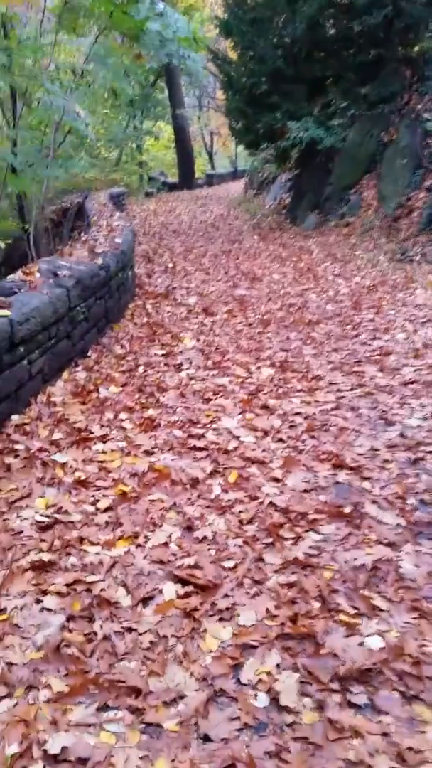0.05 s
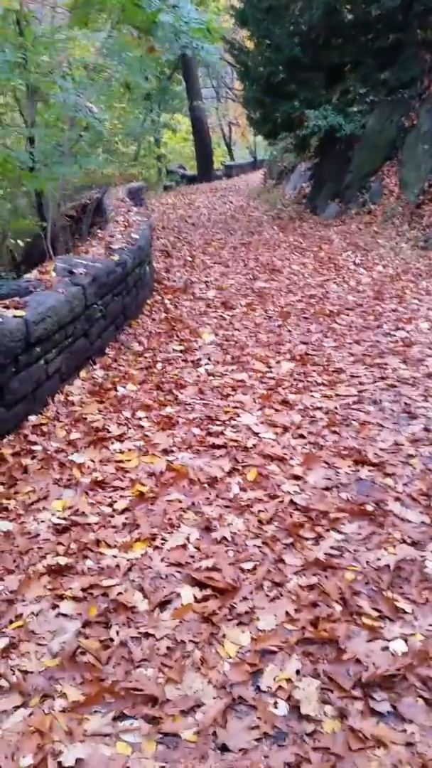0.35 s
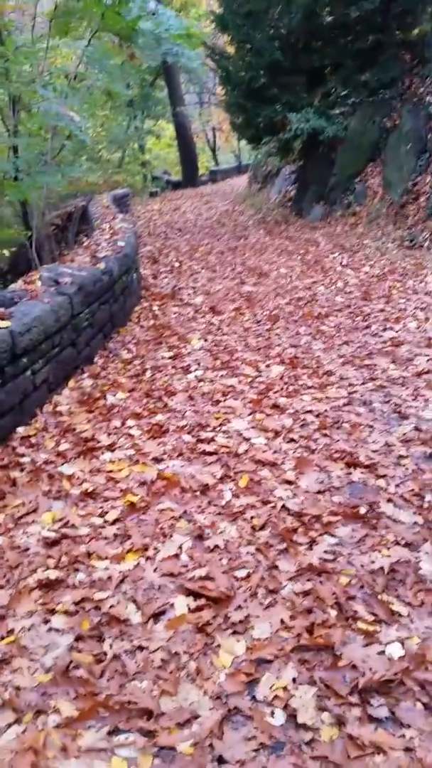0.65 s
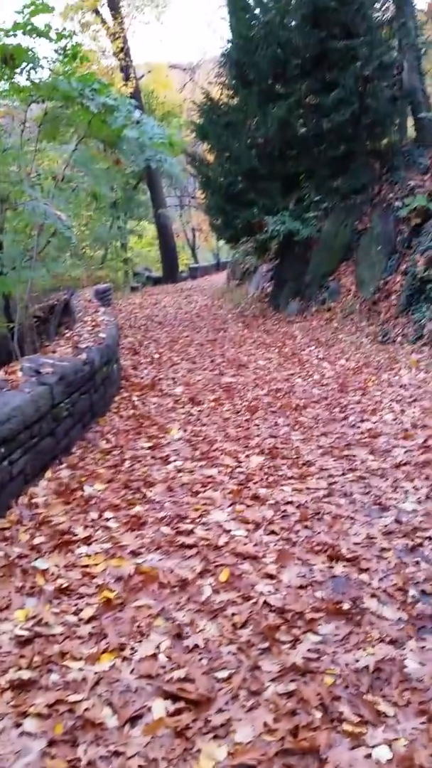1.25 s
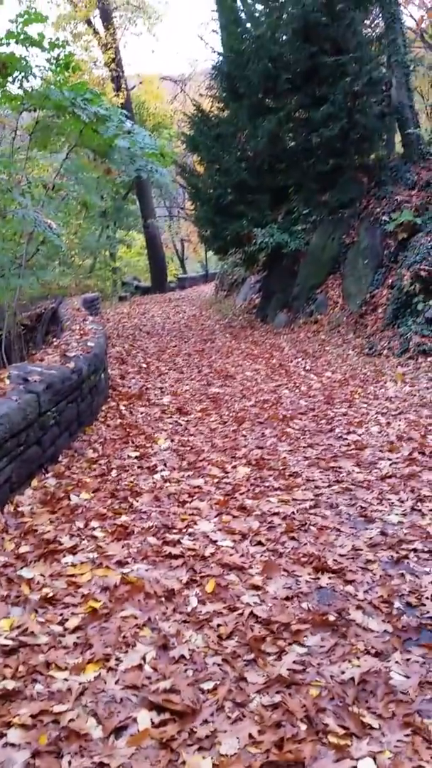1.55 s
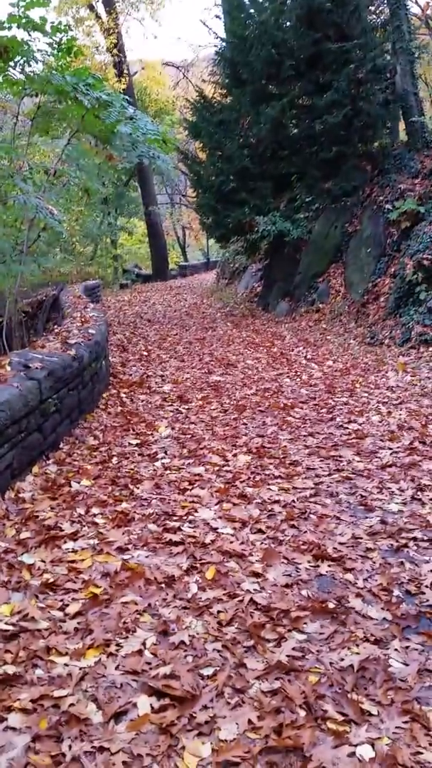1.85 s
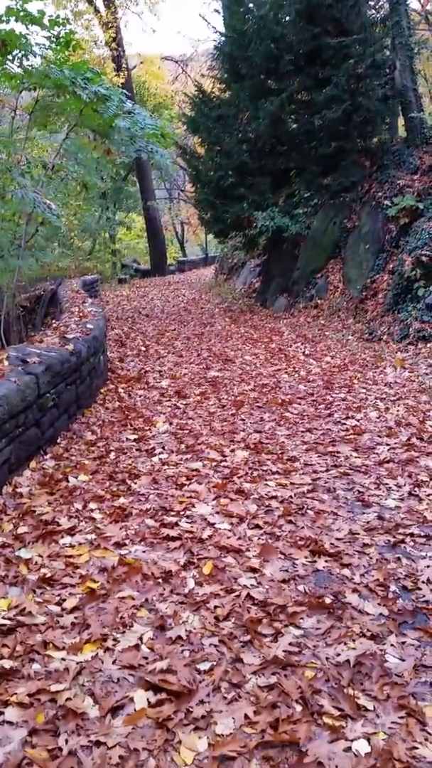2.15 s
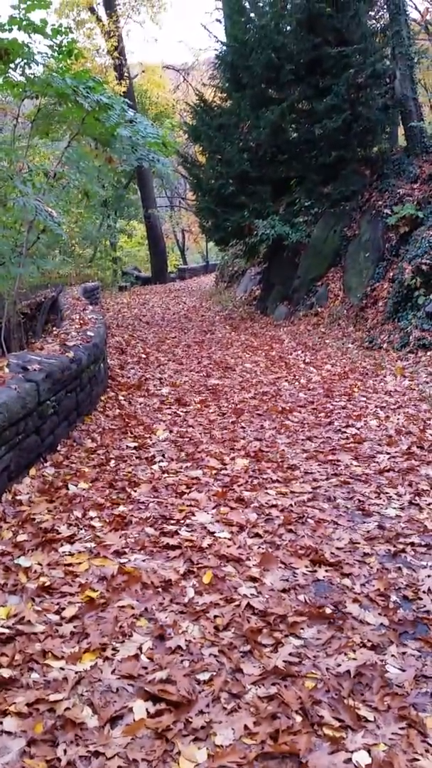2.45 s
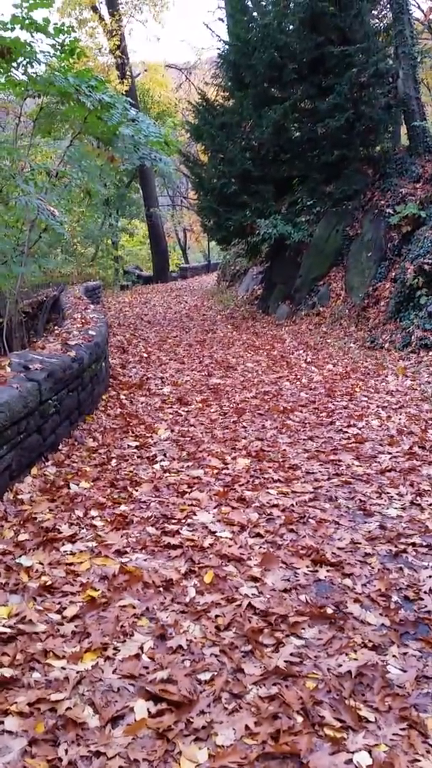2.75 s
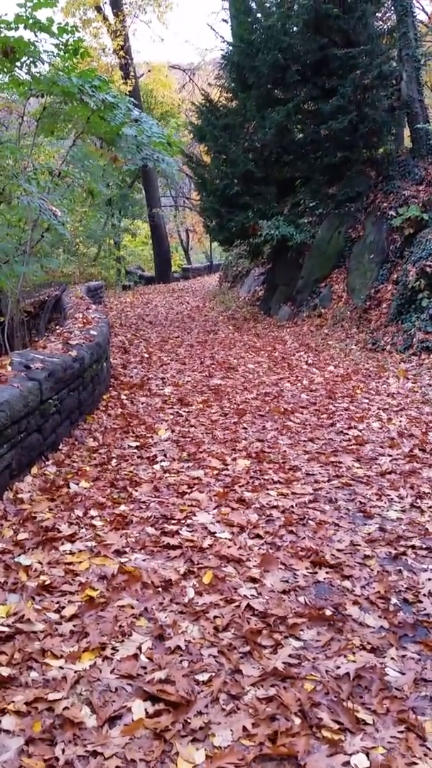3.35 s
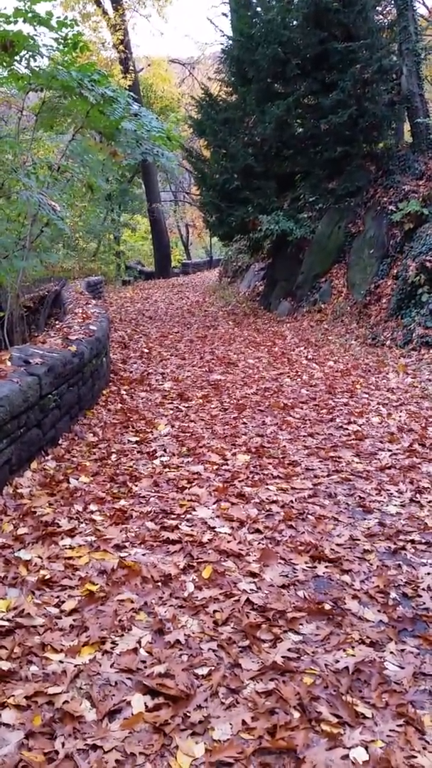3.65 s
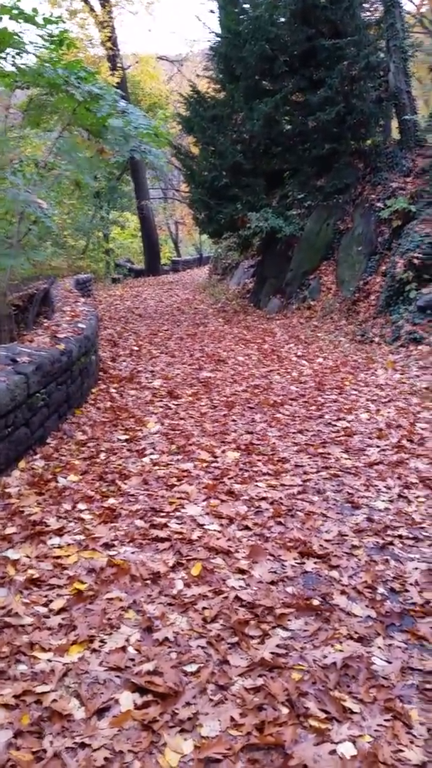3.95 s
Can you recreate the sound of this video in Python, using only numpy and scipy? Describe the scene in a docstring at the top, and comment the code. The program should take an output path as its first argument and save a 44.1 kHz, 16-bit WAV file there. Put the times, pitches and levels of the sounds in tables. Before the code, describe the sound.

A low rumble of distant traffic and wind carries a thumping rotor, probably a helicopter, that fades. Close to the microphone on a wooded path, dry leaves tick, rustle suddenly past the middle, then settle.

```python
"""A leaf-covered path in a wooded park, with traffic and wind washing in from far away.
A distant rotor, probably a helicopter, thumps twelve times a second, once per blade, and fades.
A heavy engine changes gear and pulls away. Faint thin whistles and a brief, very high hiss come and go.
Close by, dry leaves tick, rustle suddenly and settle: many tiny snaps, and leaf sliding over leaf."""
import sys
import numpy as np
from scipy import signal
from scipy.fft import rfft, irfft
from scipy.io import wavfile

SR = 44100
rng = np.random.default_rng(int(sys.argv[2]) if len(sys.argv) > 2 else 0)


def master(y):
    """Save y as 16-bit WAV."""
    cut = np.clip(np.atleast_2d(y).T, -1, 1)
    pcm = np.round(cut * 32767)  # scale
    wavfile.write(sys.argv[1], SR, pcm.astype(np.int16))


N = 176400
T = np.arange(N) / SR
BASS_PAN_DB = -2.5  # pan is left level minus right level, so below 0 leans right

# tone colour (how strong each frequency is) of traffic and wind: f/Hz, relative level/dB
WASH_COLOUR = [(110, -29.5), (200, -7), (300, -7), (430, -5.5), (600, -10), (900, -10), (1400, -14.5),
               (2000, -21.5), (2700, -26.5), (3250, -38), (4200, -39), (5400, -46), (6400, -50.5),
               (7400, -76), (8200, -54), (9100, -40.5), (10800, -57.5), (12500, -48.5), (15500, -49)]
# slight swell of the wash: t/s, level change/dB
WASH_SWELL = [(0, 0), (1, 0), (2, -0.5), (2.7, 0.5), (4, 0.5)]
# how alike the wash is on both sides: f/Hz, likeness (1 = same, 0 = unrelated)
WASH_LIKENESS = [(100, 0.92), (300, 0.97), (640, 0.88), (1400, 0.39), (3100, -.1), (7000, -0.035)]
# where the wash sits: f/Hz, pan/dB
WASH_PAN = [(200, -1.5), (700, -1.5), (1200, -5.5), (2000, -8), (3300, -9.5), (5500, -11.5), (7500, -14),
            (9000, 7), (15000, 4)]
# tone colour of the low rumble: f/Hz, relative level/dB
RUMBLE_COLOUR = [(10, -28), (25, -16), (45, 3.5), (70, -0.5), (105, 1.5), (150, -4), (230, -11),
                 (300, -18.5), (600, -66)]
# loudness of the rumble: t/s, level/dB
RUMBLE_LEVEL = [(0, -37.5), (1, -35), (2, -38.5), (3, -37.5), (4, -39.5)]
# where the rumble sits: f/Hz, pan/dB
RUMBLE_PAN = [(30, -1), (100, -3), (220, 0)]
# thin whistles and, in the last row, a brief, faint, very high hiss:
# t/s, length/s, f/Hz, width/Hz, level/dB, pan/dB
WHISTLES_AND_HISS = [(1.85, .45, 2890, 129.6, -69, -2), (1.95, .28, 7000, 300, -74.5, -8),
                     (1.83, .54, 8800, 530, -71, -2), (2.724, 0.6, 3390, 60, -64.5, -11.5),
                     (3.221, 0.91, 3274, 70.05, -65, -7), (3.27, .23, 14600, 450, -63, 6)]
# the engine's note, which is how often it fires: t/s, f/Hz, level/dB
ENGINE_NOTE = [(0, 101.2, -29), (.18, 101.4, -40), (.3, 92.7, -38), (.5, 84.16, -36), (.75, 78.8, -40),
               (1.2, 82, -44), (1.95, 87.53, -41), (2.35, 88.7, -44), (2.6, 90.77, -32.5),
               (2.76, 90.27, -41), (2.86, 90.4, -37.5), (3.15, 90.72, -36), (3.26, 91.4, -43),
               (3.36, 92.1, -38.5), (3.56, 92.16, -40), (3.8, 92.43, -40), (3.9, 92.5, -35), (4, 92.5, -39)]
# higher tones that swell in turn: multiple of the note, level/dB, loudest at t/s, swell half-width/s
ENGINE_OVERTONES = [(1.5, -42, 1.25, 0.37), (2, -44.5, 1.729, 0.22), (2.5, -49, 2.6, 0.74)]
# loudness of the blade thumps: t/s, level/dB
ROTOR_LEVEL = [(0, -26.5), (.25, -24), (.5, -17.5), (.75, -21), (1.05, -25), (1.38, -19), (1.65, -24.5),
               (2.05, -23), (2.25, -26), (2.4, -32), (3, -30), (4, -33.5)]
# loudness of the rustle's two parts: t/s, swish level/dB, crisp level/dB
RUSTLE_LEVELS = [(0, -53.5, -53), (.07, -55.5, -61.5), (.28, -59, -65), (.5, -63.5, -71), (.9, -65.5, -74),
                 (1.75, -62.5, -73), (1.9, -60.5, -67), (2.08, -58, -73), (2.33, -58, -66),
                 (2.37, -50, -57), (2.46, -44.5, -47.5), (2.53, -47.5, -50), (2.58, -44, -44),
                 (2.66, -46.5, -45), (2.73, -47.5, -49), (2.77, -52, -52.5), (2.84, -48.5, -52),
                 (2.96, -53.5, -54), (3.24, -54, -56), (3.31, -52, -53.5), (3.38, -56, -59),
                 (3.46, -52.5, -52.5), (3.59, -55, -54.5), (3.67, -55, -62), (3.75, -53.5, -62),
                 (3.82, -54.5, -57), (3.95, -53.5, -59.5)]
# tone colour of the leaves' soft swish: f/Hz, relative level/dB
SWISH_COLOUR = [(600, -26), (1400, 3), (2400, 2.5), (3100, -3.5), (3900, -1.5), (4500, -3), (5300, -14.5),
                (6600, -11.5), (7600, -22), (9500, -21), (16000, -58)]
# where the swish sits: f/Hz, pan/dB
SWISH_PAN = [(1400, -10), (2500, -6.5), (4200, -13), (5500, -17), (7500, -6)]
# tone colour of the leaves' crisp treble: f/Hz, relative level/dB
CRISP_COLOUR = [(4000, -52), (6500, -11.5), (7800, -15.5), (8600, -2), (9300, -1.5), (10100, -5),
                (11000, -9.5), (12300, -8.5), (13600, -11), (15600, -13)]
# where the crisp treble sits: f/Hz, pan/dB
CRISP_PAN = [(6500, -9), (8000, 1.5), (9000, 1.5), (10500, -4), (13000, 1.5), (15500, -7)]
# leaves sliding over each other: t/s, length/s, starting f/Hz, glide/(Hz per s), width/Hz, level/dB
SCRAPES = [(0, .5, 4940, 0, 1500, -63.5), (2.395, 0.11, 4890, -7000, 700, -53.5),
           (2.496, 0.042, 3904, -3000, 601.5, -48.5), (2.566, 0.031, 3980, -2000, 800, -49),
           (2.703, .035, 4300, -2000, 1004, -51)]
# leaf and twig ticks: t/s, level/dB, brightness/(dB per octave), pan/dB, decay/s
TICKS = [(.249, -34.5, -9, -10, 0.0016), (1.8025, -40.5, -7.5, -9, 0.0044), (1.8217, -42, -6.5, -7, 0.0038),
         (2.0745, -49, -6, -7, 0.0062), (2.3537, -44.5, 1, -5, .004), (2.594, -44, 2, -9, .003),
         (2.7115, -40.5, -7, -12, .003), (2.7892, -37.5, 4, -3, .002), (2.845, -42, 1, -4, 0.0026),
         (2.925, -40, 9, -1, 0.0019), (3.5295, -36.5, 8, -2, .0025), (3.555, -44, 12, -6, .003)]
# tone colour the ticks start from: f/Hz, relative level/dB
TICK_COLOUR = [(300, -21), (1500, -8), (1950, 0), (2400, 4), (3300, -2), (4400, 0.5), (5600, -15.5),
               (7500, -12), (9000, 0), (11500, -16.5), (15500, -18)]


def amp(db):
    """Turns decibels into a number to multiply by."""
    return 10 ** (np.asarray(db) / 20)


def unit(x):
    """Scales a signal to an average strength (rms) of 1."""
    return x / np.sqrt(np.mean(x ** 2) + 1e-20)


def at_hz(points, hz):
    """Reads a table at frequencies hz, giving each octave about equal room."""
    f, value = np.transpose(points)
    return np.interp(np.log(hz + 1), np.log(f + 1), value)


def at_time(rows, t):
    """Reads each value column of a table at times t."""
    times, *columns = np.transpose(rows)
    return [np.interp(t, times, column) for column in columns]


def pan(db):
    """Left and right gains that differ by db."""
    return amp(np.array([[.5], [-.5]]) * db)


def add(mix, start, sound):
    """Mixes a stereo sound in, start seconds from the beginning."""
    part = mix[:, max(round(start * SR), 0):][:, :sound.shape[1]]
    part += sound[:, :part.shape[1]]


def drift(rate_hz):
    """A smooth random wander of strength 1; a higher rate wanders faster."""
    hz = np.fft.rfftfreq(N, 1 / SR)
    keep_slow = np.exp(-(hz / rate_hz) ** 2) * (hz > 0)
    return unit(irfft(rfft(rng.standard_normal(N)) * keep_slow, N))


def colour(x, levels, pans):
    """Gives each frequency of a stereo signal its level and pan; the result has strength 1."""
    hz = np.fft.rfftfreq(N, 1 / SR)
    return unit(irfft(rfft(x) * amp(at_hz(levels, hz)) * pan(at_hz(pans, hz)), N))


def fuzzy_tone(hz, width_hz):
    """A band of noise that follows the pitch curve hz, unrelated left and right."""
    pole = np.exp(-np.pi * width_hz / SR)
    noise = rng.standard_normal((2, N)) + 1j * rng.standard_normal((2, N))
    smoothed = signal.lfilter([1], np.poly([pole, pole]), noise)[:, -len(hz):]
    tone = np.exp(2j * np.pi * np.cumsum(hz) / SR)
    return unit((smoothed * tone).real)


def air():
    """Stereo noise whose two sides are alike in the bass and nearly unrelated in the treble."""
    left, other = rfft(rng.standard_normal((2, N)))
    likeness = at_hz(WASH_LIKENESS, np.fft.rfftfreq(N, 1 / SR))
    right = likeness * left + np.sqrt(1 - likeness ** 2) * other
    return irfft(np.array([left, right]), N)


def traffic_and_wind(level_db=-42.5):
    """Far traffic and wind blur into one wash of noise over a low rumble."""
    wash = colour(air(), WASH_COLOUR, WASH_PAN)
    wash_db = level_db + at_time(WASH_SWELL, T)[0] + 0.38 * drift(2.7)
    rumble = colour(air(), RUMBLE_COLOUR, RUMBLE_PAN)
    return wash * amp(wash_db) + rumble * amp(at_time(RUMBLE_LEVEL, T)[0])


def whistles_and_hiss(fade_s=0.064):
    """Narrow bands of noise fade in and out: thin whistles and one brief, faint, very high hiss."""
    out = np.zeros((2, N))
    for start, length, hz, width_hz, db, pan_db in WHISTLES_AND_HISS:
        t = np.arange(0, length, 1 / SR)
        fade = np.minimum(np.minimum(t, length - t) / fade_s, 1)
        band = fuzzy_tone(np.full(len(t), hz), width_hz)
        add(out, start, band * fade * amp(db) * pan(pan_db))
    return out


def engine(waver_db=3.5, hum_hz=213.9, hum_db=-55.5):
    """The exhaust note sags at a gear change and climbs again, beside a hum that stays near one pitch."""
    hz, db = at_time(ENGINE_NOTE, T)
    firings = np.cumsum(hz + 0.42 * drift(4.8)) / SR
    out = amp(db + waver_db * drift(9.8)) * np.sin(2 * np.pi * firings)
    for multiple, overtone_db, loudest_s, swell_s in ENGINE_OVERTONES:
        swell = amp(overtone_db + waver_db * drift(2.7)) / (1 + ((T - loudest_s) / swell_s) ** 2)
        out += swell * np.sin(2 * np.pi * (multiple * firings + rng.random()))
    hum_gain = amp(hum_db + waver_db * drift(2.8))
    hum_cycles = np.cumsum(hum_hz + 2.48 * drift(10.7)) / SR
    out += hum_gain * np.sin(2 * np.pi * hum_cycles)
    return np.sqrt(2) * out * pan(BASS_PAN_DB)


def rotor(first_s=-0.0045, gap_s=0.08295, thump_hz=64.2, width_s=0.012, scatter_db=0.5):
    """Each blade sends one push and pull of air pressure, dulled by distance."""
    out = np.zeros(N)
    for centre in np.arange(first_s, N / SR, gap_s):
        near = abs(T - centre) < 4 * width_s
        t = T[near] - centre
        size = amp(at_time(ROTOR_LEVEL, centre)[0] - scatter_db * rng.standard_normal())
        out[near] -= size * np.sin(2 * np.pi * thump_hz * t) * np.exp(-(t / width_s) ** 2)
    return out * pan(BASS_PAN_DB)


def crackle(snaps_per_s=1500, spread_db=2.5, snap_share=0.26, clump_db=1.0):
    """Countless tiny snaps over the hiss of sliding leaves, swelling in small clumps."""
    sizes = amp(spread_db * np.minimum(rng.exponential(1, N), 5))
    snapping = rng.random(N) < snaps_per_s / SR
    snaps = unit(sizes * snapping * rng.standard_normal((2, N)))
    hiss = rng.standard_normal((2, N))
    blend = np.sqrt(snap_share) * snaps + np.sqrt(1 - snap_share) * hiss
    return blend * amp(clump_db * drift(38))


def rustle():
    """Dry leaves crackle, with a soft swish below and a crisp treble on top."""
    swish_db, crisp_db = at_time(RUSTLE_LEVELS, T)
    swish = colour(crackle(), SWISH_COLOUR, SWISH_PAN)
    crisp = colour(crackle(), CRISP_COLOUR, CRISP_PAN)
    return swish * amp(swish_db) + crisp * amp(crisp_db)


def scrapes(rasp_db=3.5, pan_db=-12):
    """Leaves slide over each other in short rasps, most of them falling in pitch."""
    out = np.zeros((2, N))
    for start, length, hz, glide, width_hz, db in SCRAPES:
        t = np.arange(0, length, 1 / SR)
        tone = fuzzy_tone(hz + glide * t, width_hz)
        rasp = amp(rasp_db * drift(300)[:len(t)])
        fade = np.sin(np.pi * t / length)
        add(out, start, unit(tone * rasp) * fade * amp(db) * pan(pan_db))
    return out


def knock(start=0.226, length=0.048, hz=319.2, db=-37):
    """A soft hollow knock that comes with the first tick."""
    out = np.zeros((2, N))
    t = np.arange(0, length, 1 / SR)
    fade = np.sin(np.pi * t / length)
    add(out, start, np.sin(2 * np.pi * hz * t) * fade * amp(db) * pan(BASS_PAN_DB))
    return out


def ticks():
    """Single leaves and twigs snap, each a burst of noise that dies away at once."""
    out, t = np.zeros((2, N)), T[:2048]
    hz = np.fft.rfftfreq(len(t), 1 / SR)
    octaves = np.log2(np.maximum(hz, 1500) / 4000)  # brightness tips the treble around 4000 Hz
    for start, db, brightness, pan_db, decay_s in TICKS:
        shape = amp(at_hz(TICK_COLOUR, hz) + brightness * octaves)
        noise = rng.standard_normal((2, len(t)))
        snap = unit(irfft(rfft(noise) * shape)) * np.exp(-t / decay_s)
        add(out, start, snap * amp(db) * pan(pan_db))
    return out


def scene():
    """The wash, faint high sounds and distant machines behind the nearby leaves."""
    background = traffic_and_wind() + whistles_and_hiss() + engine() + rotor()
    foreground = rustle() + scrapes() + knock() + ticks()
    return background + foreground


def record(dry):
    """Steeply cuts away the very highest treble."""
    cutoff_hz = 15850
    low_pass = signal.firwin(511, cutoff_hz, window=("kaiser", 9), fs=SR)
    return signal.oaconvolve(dry, low_pass[None], "same", axes=1)


dry = scene()
out = record(dry)
master(out)
```